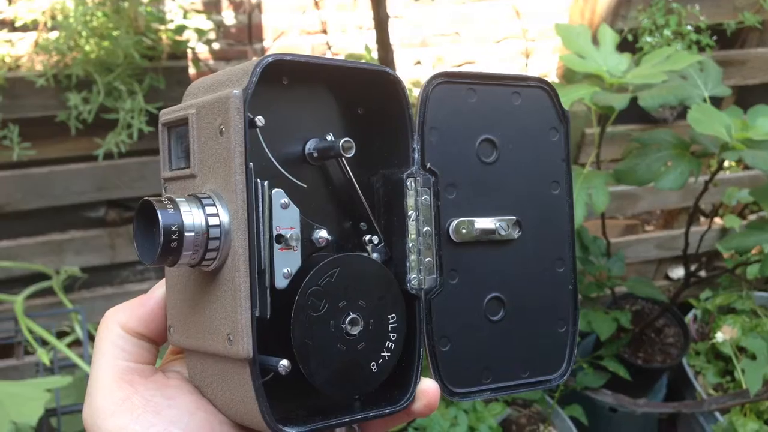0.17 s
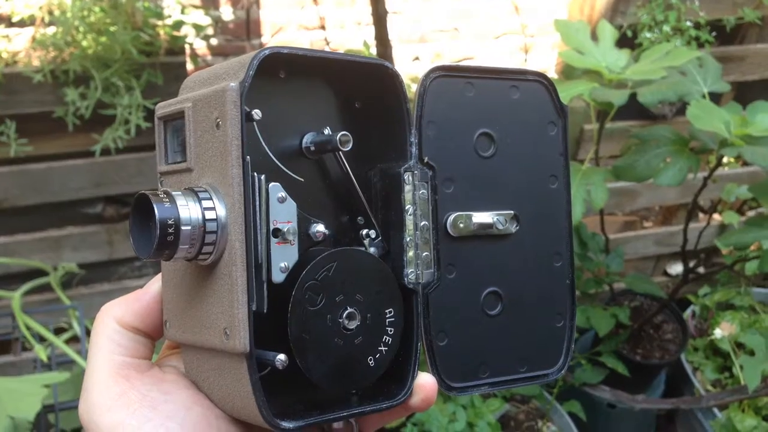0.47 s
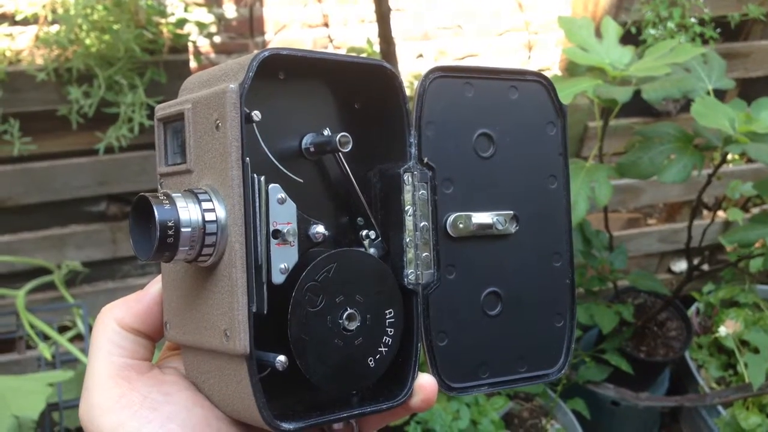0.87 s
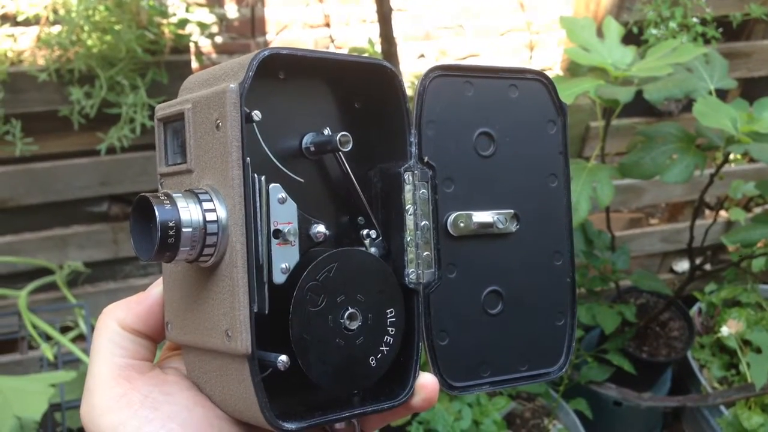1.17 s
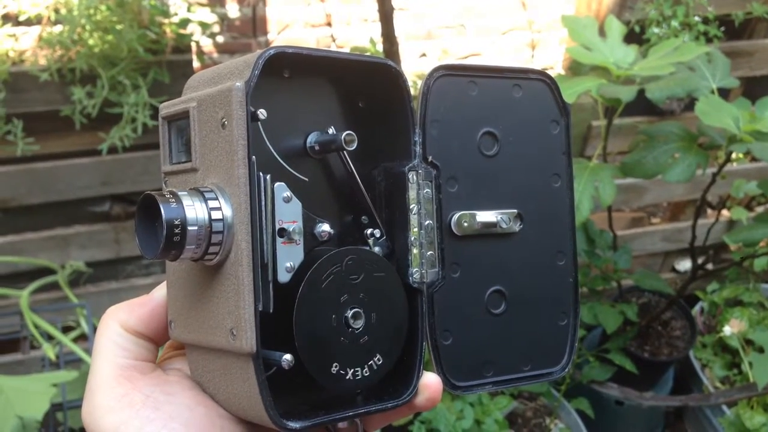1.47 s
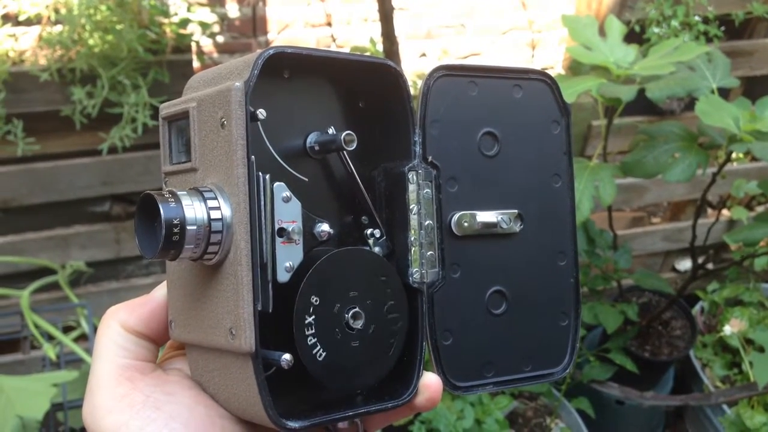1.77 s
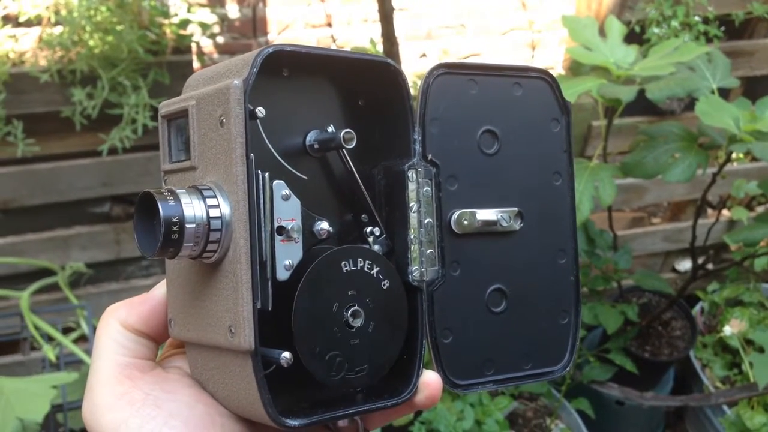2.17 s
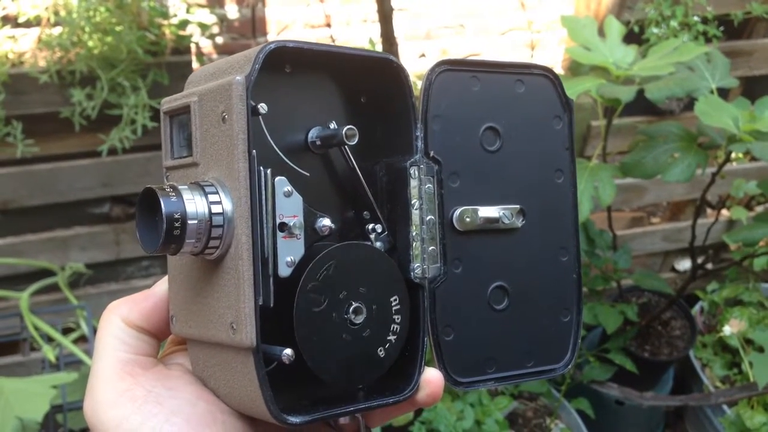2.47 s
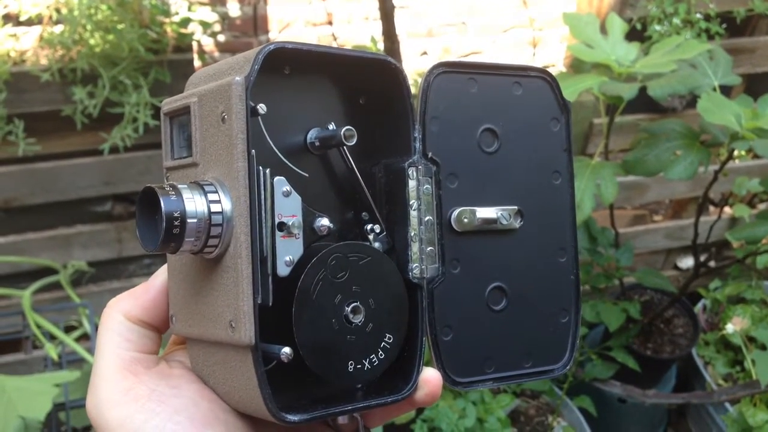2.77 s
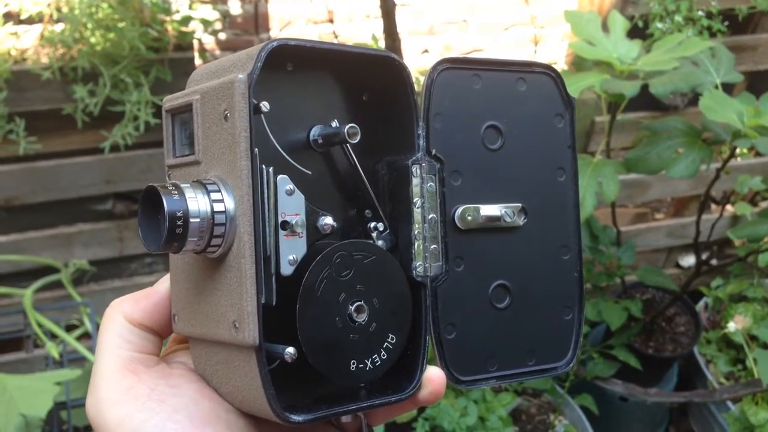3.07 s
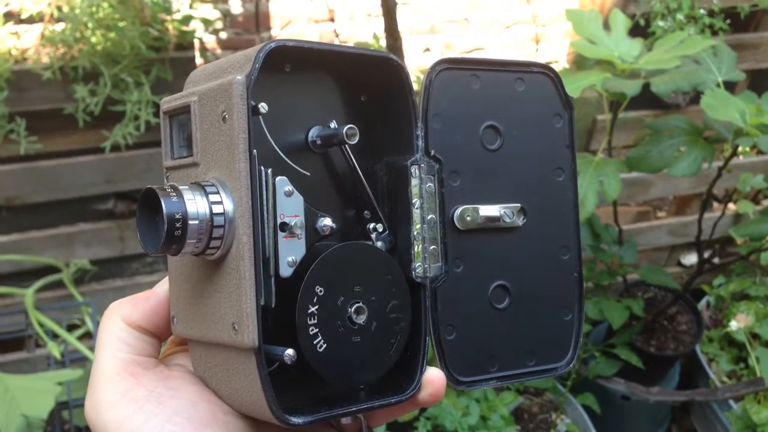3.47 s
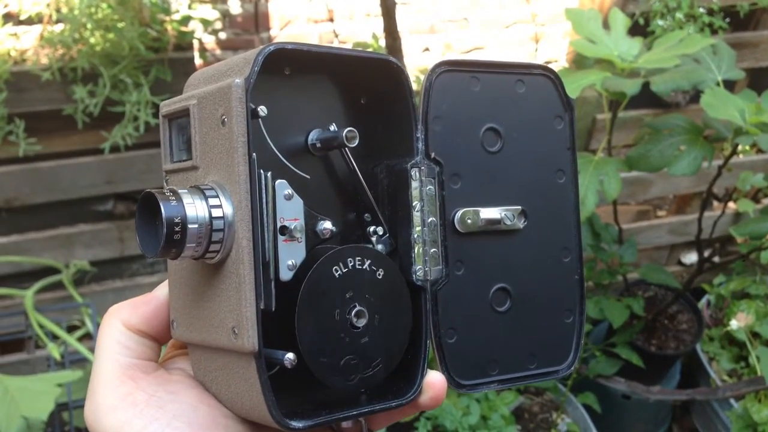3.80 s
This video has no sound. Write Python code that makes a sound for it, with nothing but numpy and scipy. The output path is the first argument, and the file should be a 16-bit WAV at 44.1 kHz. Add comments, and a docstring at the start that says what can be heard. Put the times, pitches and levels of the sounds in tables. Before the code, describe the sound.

A small film camera runs close by, its motor humming faintly over steady outdoor hiss. Light ticks lead into a rapid mechanical chatter that swells until one sharp metallic click. The chatter dies away, then returns more softly.

```python
"""A small film camera runs in the hand with its door open: motor hum and gear whir on a bed of garden hiss.
Near 1.4 s a few light ticks lead into the chatter of the film transport, about 32 cycles a second,
each ringing the frame, a thin spring and the film gate. The chatter swells until, at 2.7 s, the catch
snaps against the metal case in one sharp click, and the chatter dies away.
From 3.2 s the light ticks return over a softer chatter."""
import sys
import numpy as np
from scipy import signal
from scipy.fft import rfft, irfft
from scipy.io import wavfile
from scipy.ndimage import uniform_filter1d

SR = 44100
rng = np.random.default_rng(int(sys.argv[2]) if len(sys.argv) > 2 else 0)


def generate_wav(signal):
    """Clip the signal to [-1, 1] and save it as 16-bit WAV at the path in sys.argv[1]."""
    frames = np.transpose(np.atleast_2d(signal))
    scaled = np.clip(frames, -1, 1) * 32767
    pcm = np.round(scaled).astype(np.int16)
    wavfile.write(sys.argv[1], SR, pcm)


N = 173754

# tone colour of the garden hiss (frequency [Hz], relative level [dB])
HISS_COLOUR = [(20, -37), (40, -36), (62, 0), (98, -5.5), (185, 4.5), (300, -4.5), (410, -2), (750, -5),
               (1400, -6.5), (2050, -8.5), (2900, -9.5), (3900, -7.5), (5200, -13.5), (7000, -18),
               (9500, -23), (12500, -28.5), (15500, -30.5)]
# level ride of the motor's second harmonic (time [s], level [dB])
DRONE_RIDE = [(.1, -57.5), (1.2, -52.5), (1.7, -60.5), (3.9, -62)]
# upper tones of the motor hum (harmonic [x shaft speed], level [dB])
MOTOR_TONES = [(3, -49.5), (4, -63)]
# tones of the gear whir (harmonic [x shaft speed], level [dB])
GEAR_TONES = [(1, -64.5), (2, -59), (3, -73), (4, -65.5), (5, -71), (6, -67.5), (7, -68), (8, -67),
              (9, -69), (11, -69.5)]
# single light ticks (time [s], level [dB], spring send [dB])
LIGHT_TICKS = [(1.386, -29, 2), (1.393, -29, 0), (1.429, -26, -6), (1.469, -29.5, 2), (1.508, -23.5, -5),
               (1.596, -29, 5), (1.652, -24, 0), (3.190, -33.5, 5), (3.197, -28, 4), (3.236, -26.5, -10),
               (3.411, -28, -2), (3.556, -30, -2), (3.65, -27, 5), (3.654, -32, 6), (3.6834, -28, 4),
               (3.687, -29, 0), (3.775, -27, 5), (3.779, -29, 8), (3.87, -31, 0), (3.876, -26, -1)]
# level ride of the chatter (time [s], relative level [dB])
CHATTER_RIDE = [(.1, -44), (1.33, -20), (1.4, -4), (1.56, -6), (1.7, -1), (2.1, 1.5), (2.4, 1), (2.68, 1.5),
                (2.76, -7), (3.15, -36), (3.25, -8.5), (3.9, -6)]
# contacts in a cycle (offset from the main one [s], relative level [dB], spring send [dB], gate send [dB])
CYCLE_CONTACTS = [(-.0068, -2, -4, -9), (0, -1, -0.5, -6), (.0035, -0.5, -16, 0)]
# tone colour of a contact's attack (frequency [Hz], relative level [dB])
TICK_COLOUR = [(200, 0), (1100, -14.5), (2200, 1.5), (2850, -16.5), (3300, 3.5), (4600, -8), (5700, -3.5),
               (7300, -11), (9000, -11), (11000, -16.5), (15000, -16.5)]
# modes of the transport's frame (frequency [Hz], relative level [dB], t60 [s])
FRAME_MODES = [(2280, -44, .02), (3317, -28.5, 0.029), (3960, -27.5, 0.013), (5150, -28, 0.013),
               (5830, -31.5, 0.011)]
# modes of the film gate (frequency [Hz], relative level [dB], t60 [s])
GATE_MODES = [(1578, -22, .04), (2575, -26, .036)]
# hits in the click: the catch, its blow and its bounce (time [s], level [dB])
CLICK_HITS = [(2.7212, -22), (2.7262, -1), (2.7297, -24)]
# modes of the metal case (frequency [Hz], relative level [dB], t60 [s])
CASE_MODES = [(586, -33, 0.041), (850, -42, 0.016), (1440, -28, 0.018), (1750, -37, 0.039),
              (2020, -23.5, 0.017), (2274, -19.5, 0.018), (2520, -32, 0.034), (3480, -33.5, 0.021),
              (5550, -29, 0.024), (6490, -31, 0.016)]
# tone colour of the click's crack (frequency [Hz], relative level [dB])
CRACK_COLOUR = [(200, -30), (500, 3), (1100, -4), (1700, -1), (2250, 3), (2900, -18), (6000, -3),
                (8000, -9), (11000, -15), (15000, -24)]


def amp(db):
    """Decibels to gain."""
    return 10 ** (np.asarray(db) / 20)


def unit(x):
    """Scales to an rms of one."""
    return x / np.sqrt(np.mean(x ** 2) + 1e-20)


def ride(points, t):
    """Reads a level ride at times t."""
    return np.interp(t, *np.transpose(points))


def spectrum(points, hz):
    """Reads a dB table on a log-frequency axis."""
    f, db = np.transpose(points)
    return np.interp(np.log(hz + 1), np.log(f), db)


def add(mix, s, sound):
    """Mixes a sound in at time s."""
    part = mix[max(round(s * SR), 0):][:len(sound)]
    part += sound[:len(part)]


def wander(rate_hz):
    """Smooth random modulation of rms one."""
    rolloff = 1 + (np.fft.rfftfreq(N, 1 / SR) / rate_hz) ** 4
    return unit(irfft(rfft(rng.standard_normal(N)) / rolloff, N))


def variation():
    """Two random amounts, held within two standard deviations."""
    return np.clip(rng.standard_normal(2), -2, 2)


def colour(points, size=2048):
    """Minimum-phase impulse of unit energy with the given tone colour."""
    log_gain = np.log(amp(spectrum(points, abs(np.fft.fftfreq(size, 1 / SR)))))
    impulse = np.fft.ifft(np.exp(np.conj(signal.hilbert(log_gain)))).real[:size // 2]
    return impulse / np.linalg.norm(impulse)


def ring(modes, size=3072):
    """Dying sines of a struck part."""
    t = np.arange(size) / SR
    return sum(amp(db - 60 * t / t60) * np.sin(2 * np.pi * hz * t) for hz, db, t60 in modes)


def burst(decay_s, size=1024):
    """A brief rough contact of unit energy."""
    x = rng.standard_normal(size) * np.exp(-np.arange(size) / SR / decay_s)
    return x / np.linalg.norm(x)


def garden_hiss(level_db=-47.5, patchy_db=1.17, flutter_db=.5, size=2048):
    """A steady noise bed with faint patches in its colour and a slight flutter in its level."""
    hz, hop = np.fft.rfftfreq(size, 1 / SR), size // 4
    real, imag, patches = rng.standard_normal((3, N // hop + 5, len(hz)))
    patches = uniform_filter1d(patches, size=4, axis=0)  # smooth over time
    patches = unit(uniform_filter1d(patches, size=16, axis=1))  # and over frequency
    spectra = (real + 1j * imag) * amp(spectrum(HISS_COLOUR, hz) + patchy_db * patches)
    noise = signal.istft(spectra.T, nperseg=size, noverlap=size - hop)[1][:N]
    return amp(level_db + flutter_db * wander(30)) * unit(noise)


def shaft(speed_hz, tones, waver, shake):
    """Harmonics of an unsteady shaft: they waver in pitch together and shake in level one by one."""
    turns = np.cumsum(speed_hz * (1 + waver * wander(8))) / SR
    out = np.zeros(N)
    for harmonic, db in tones:
        gain = np.sqrt(2) * amp(db) * (1 + shake * wander(20))
        out += gain * np.sin(2 * np.pi * (harmonic * turns + rng.random()))
    return out


def motor_hum():
    """The motor shaft hums low; its deepest tone swells, then eases back."""
    drone = (2, ride(DRONE_RIDE, np.arange(N) / SR))
    return shaft(speed_hz=40.05, tones=[drone] + MOTOR_TONES, waver=.0099, shake=.17)


def gear_whir():
    """The gears turn faster and steadier, with a taller stack of harmonics."""
    return shaft(speed_hz=69.25, tones=GEAR_TONES, waver=.0033, shake=.22)


def chatter_contacts(cycle_hz=32.055, beat_at_s=2.2204, level_db=-25, rattle_db=-11.5):
    """Three quick contacts a cycle, plus loose parts rattling: (time, level, spring send, gate send)."""
    slop_s, stroke_db = .0004, .9  # play in a whole cycle
    jitter_s, scatter_db = .0004, 1.3  # play in each contact
    gate_hold = .15  # the gate keeps ringing as the chatter fades: share of the dB drop it is spared
    contacts = []
    for s in np.arange(beat_at_s % (1 / cycle_hz), N / SR, 1 / cycle_hz):
        slop, stroke = variation()
        ride_db = ride(CHATTER_RIDE, s)
        cycle_db = level_db + ride_db + stroke_db * stroke
        for offset, db, spring_db, gate_db in CYCLE_CONTACTS:
            late, strong = variation()
            hit_s = s + slop_s * slop + offset + jitter_s * late
            hit_db = cycle_db + db + scatter_db * strong
            contacts.append((hit_s, hit_db, spring_db, gate_db - gate_hold * ride_db))
        for phase in rng.random(4):  # rattles land anywhere in the cycle
            contacts.append((s + phase / cycle_hz, cycle_db + rattle_db, 2, 0))
    return contacts


def film_transport(spring_hz=12820, spring_db=-25, spring_t60=.005):
    """Every light tick and chatter contact rings the frame, a thin spring and the film gate."""
    ticks = [(s, db, spring_send, 0) for s, db, spring_send in LIGHT_TICKS]
    frame, gate, out = ring(FRAME_MODES), ring(GATE_MODES), np.zeros(N)
    add(frame, 0, colour(TICK_COLOUR))
    for s, db, spring_send, gate_send in ticks + chatter_contacts():
        caught, where = variation()  # how hard the spring is caught sets its level; where, its pitch
        ping_hz = spring_hz * (1 + .014 * where)
        ping_db = spring_db + spring_send + 4 * caught
        body = frame + ring([(ping_hz, ping_db, spring_t60)]) + amp(gate_send) * gate
        add(out, s, amp(db) * signal.fftconvolve(burst(decay_s=.002), body))
    return out


def catch_click(crack_db=-8, crack_lead_s=.00024, low_cut_hz=440, tail_db=-8.5, tail_t60=.075):
    """The catch cracks, then rings the case; the fence and plants scatter a short tail."""
    snap, t = np.zeros(N), np.arange(SR // 2) / SR
    for s, db in CLICK_HITS:
        crack = np.convolve(burst(decay_s=.0009), colour(CRACK_COLOUR))
        add(snap, s - crack_lead_s, amp(db + crack_db) * crack)
        add(snap, s, amp(db) * ring(CASE_MODES))
    # the small case radiates little bass
    snap = signal.sosfilt(signal.butter(6, low_cut_hz, "high", fs=SR, output="sos"), snap)
    tail = rng.standard_normal(len(t)) * amp(-60 * t / tail_t60)
    return snap + amp(tail_db) * signal.fftconvolve(snap, tail / np.linalg.norm(tail))[:N]


def scene():
    """Garden and camera in one mono mix, the same on both channels."""
    mix = garden_hiss() + motor_hum() + gear_whir() + film_transport() + catch_click()
    return np.tile(mix, (2, 1))


def record(dry, start_s=.1203, high_cut_hz=15330):
    """The sound cuts in after a moment of silence, with a steep high cut."""
    live = dry * (np.arange(N) / SR >= start_s)
    high_cut = signal.firwin(511, high_cut_hz, window=("kaiser", 9), fs=SR)
    return signal.oaconvolve(live, high_cut[None], "same")


dry = scene()
out = record(dry)
generate_wav(out)
```